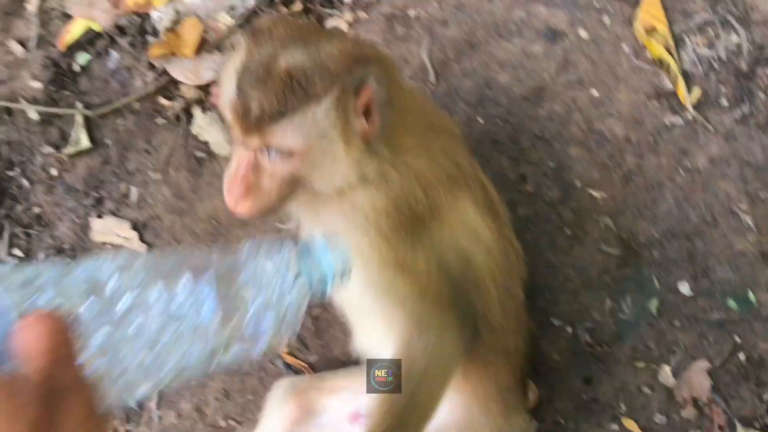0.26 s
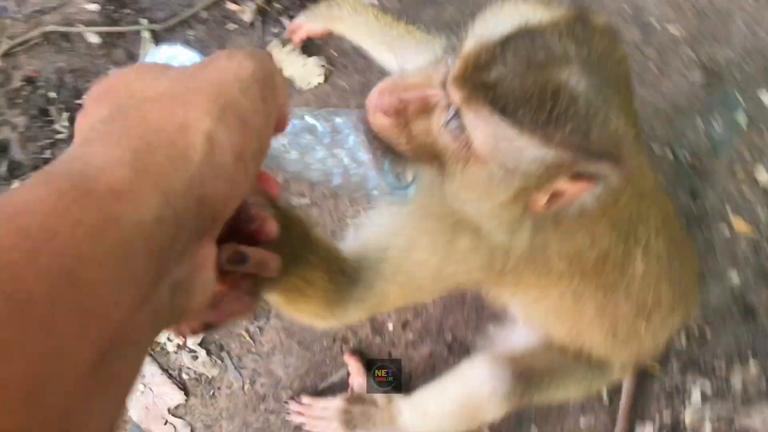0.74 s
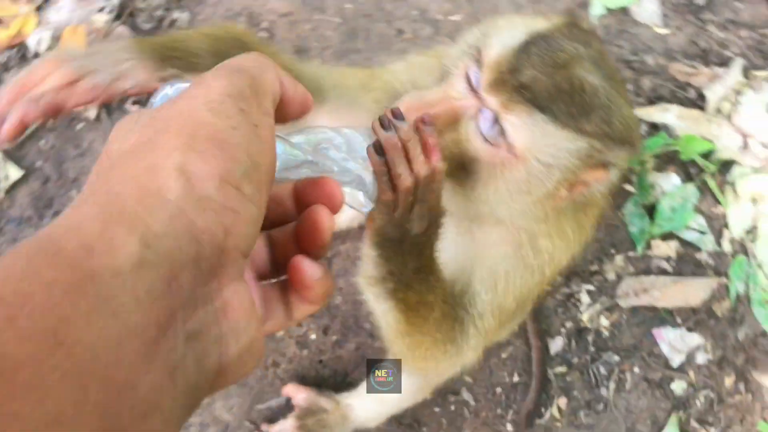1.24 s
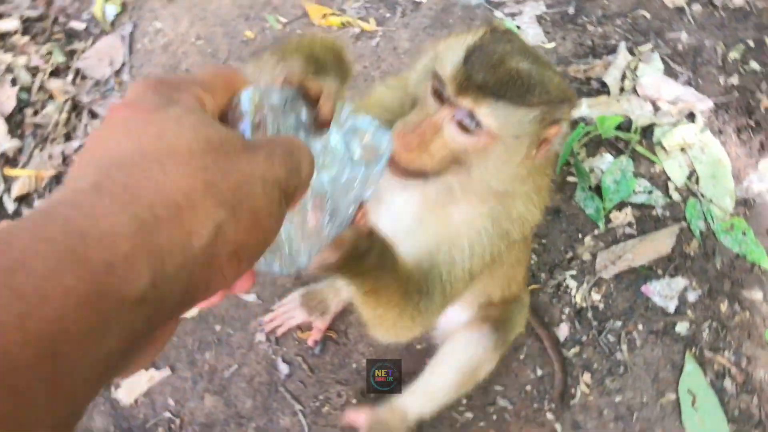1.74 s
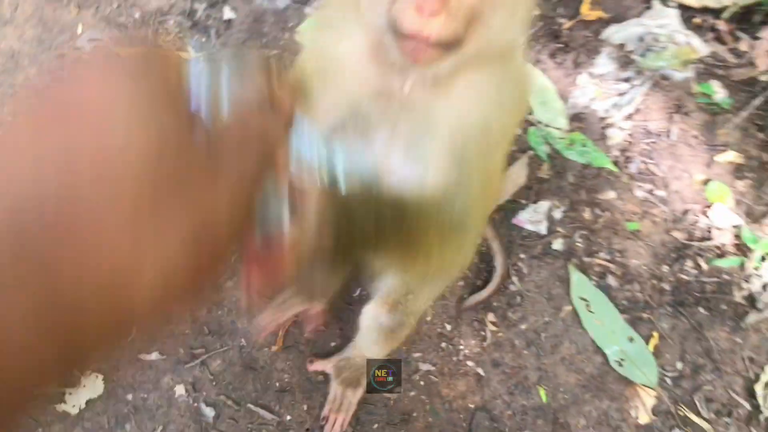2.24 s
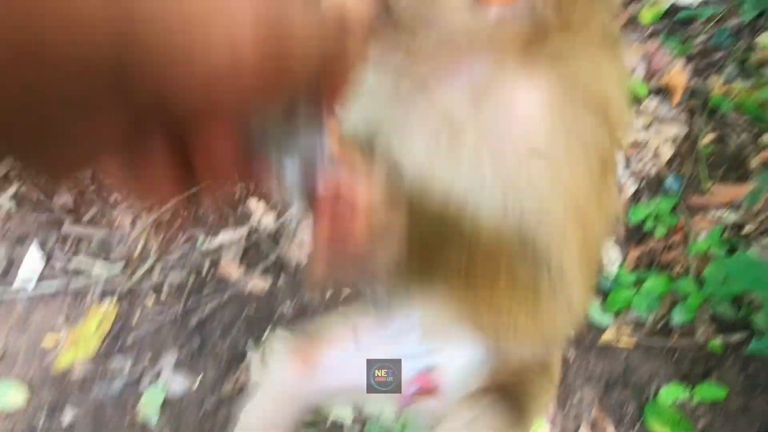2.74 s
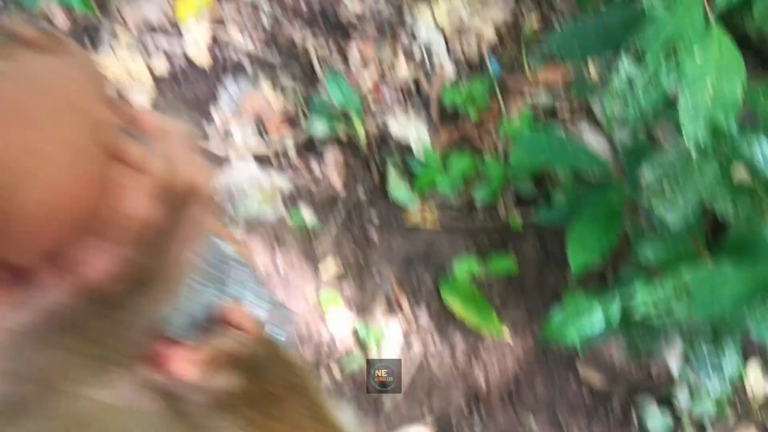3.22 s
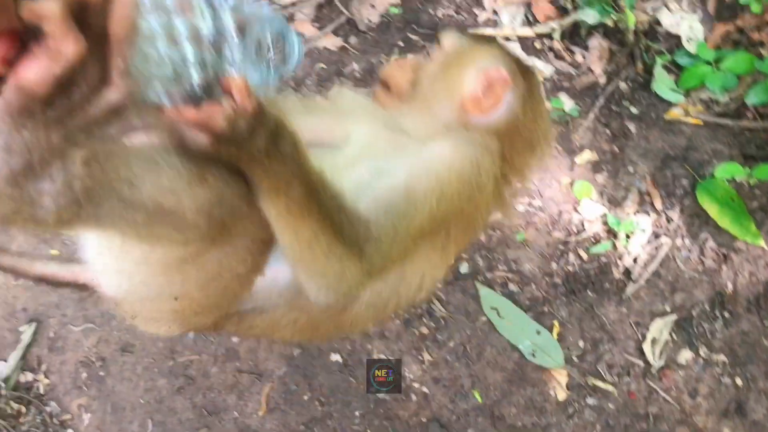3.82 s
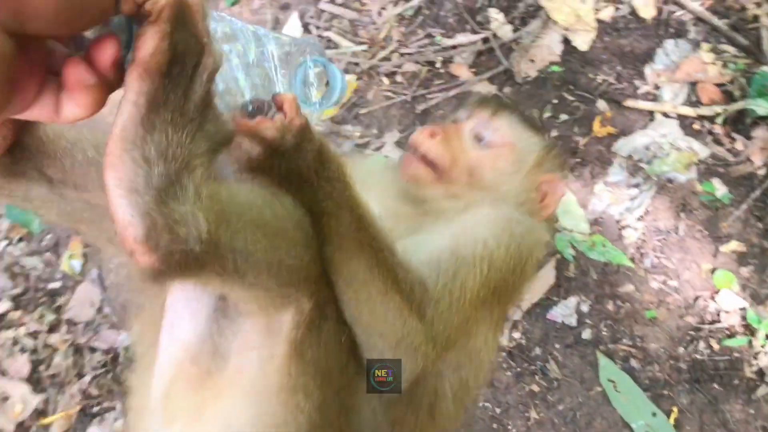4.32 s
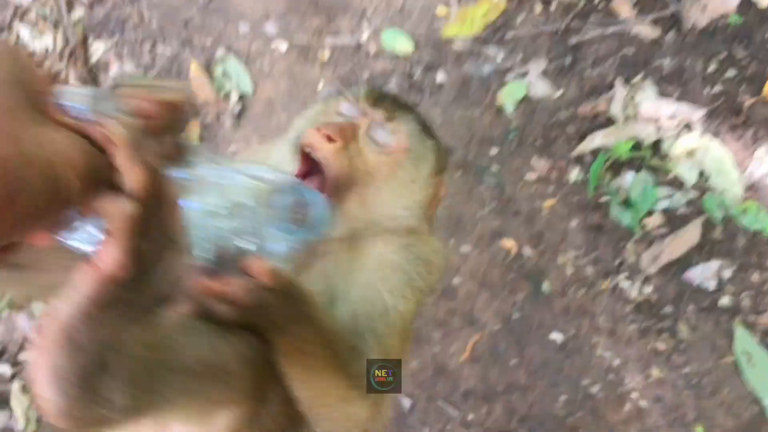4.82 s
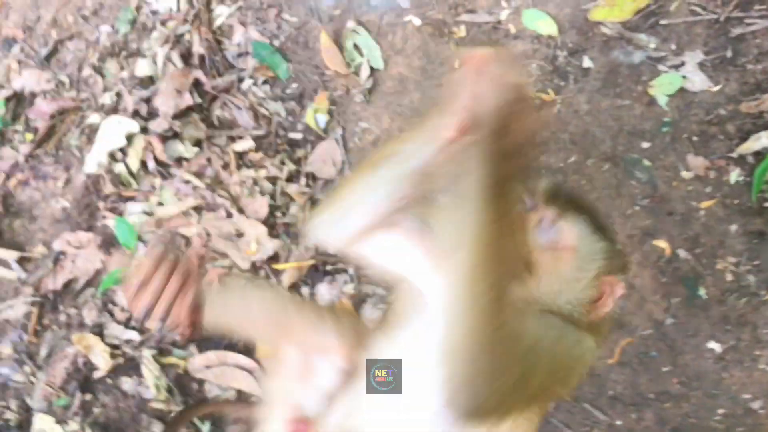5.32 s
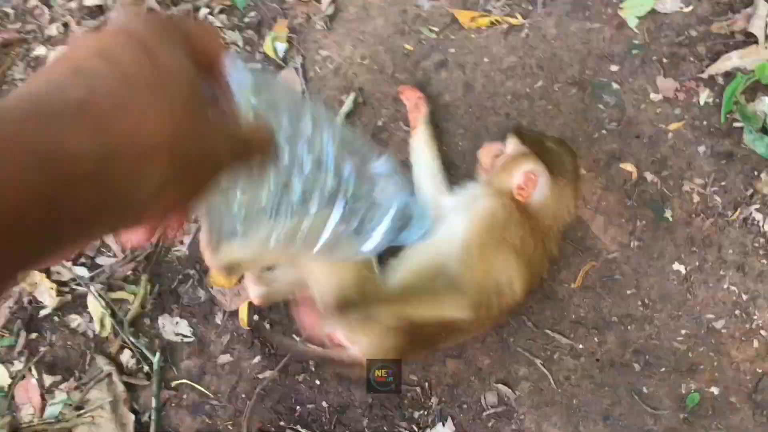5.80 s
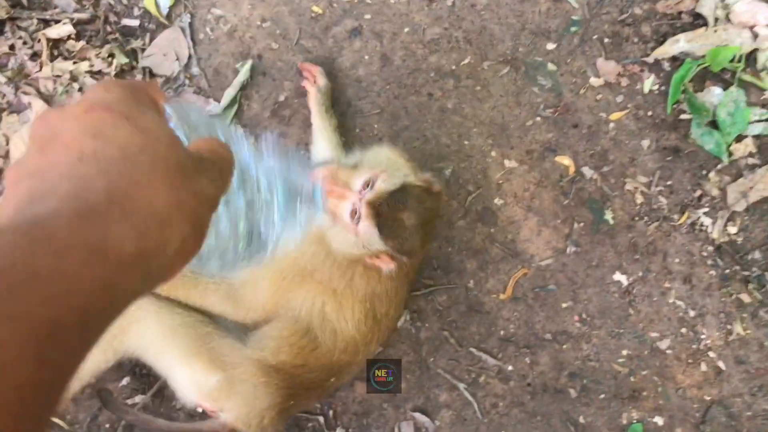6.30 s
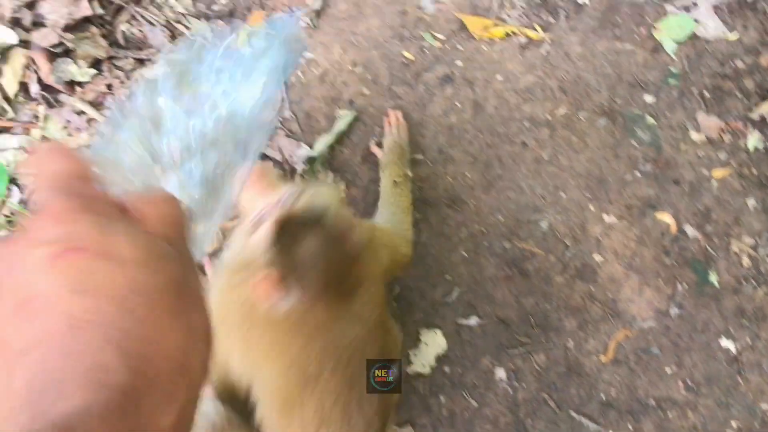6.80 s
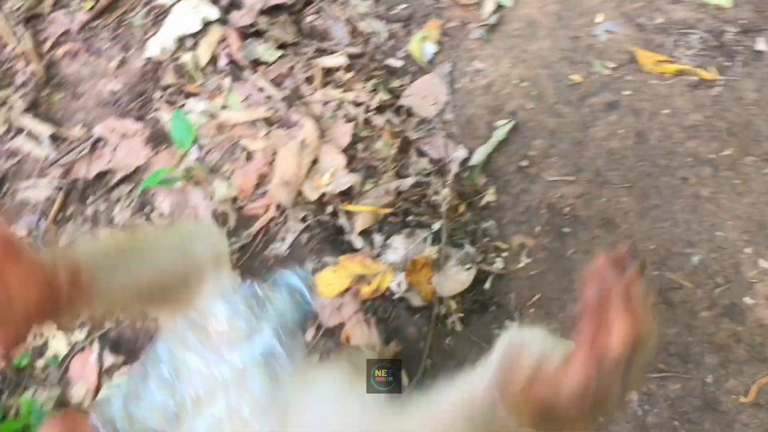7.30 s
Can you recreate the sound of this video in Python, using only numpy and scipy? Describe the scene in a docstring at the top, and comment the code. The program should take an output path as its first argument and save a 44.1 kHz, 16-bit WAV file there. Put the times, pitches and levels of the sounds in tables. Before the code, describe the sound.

A thin empty plastic bottle is pulled between a hand and a small monkey on a forest floor. Sparse pops and rubs come first, then squeaky creaks, ratcheting slips and snaps. A dense loud crackle with hollow thumps peaks just after five seconds, followed by one sharp leaf crunch and soft taps. Close microphone, dry outdoors, low rumble and faint high hiss.

```python
"""Monkey tugging at a plastic bottle

A young monkey grabs and tugs at an empty thin bottle held out by a hand, on a forest floor.
Wall snaps, slips, creaks and taps are jolts of noise-driven wall modes plus a dent ring; thuds are low decaying sines.
Rubbing and dry leaves are coloured noise grains; rumble, faint air and a very high hiss are coloured noise.
"""
import sys
import numpy as np
from scipy import signal
from scipy.fft import rfft, irfft
from scipy.io import wavfile

SR = 44100
rng = np.random.default_rng(int(sys.argv[2]) if len(sys.argv) > 2 else 0)


def put_to_file(sound):
    """Save the sound as 16-bit audio at rate SR, in the file named by the first command-line argument."""
    columns = np.atleast_2d(sound).T  # one column per channel
    safe = np.clip(columns, -1, 1)
    whole_steps = np.round(safe * 32767)
    wavfile.write(sys.argv[1], SR, whole_steps.astype(np.int16))


N = 332955
TIME_S = np.arange(N) / SR
AGE_S = np.arange(4096) / SR   # time since a contact

# Background spectra. Each row: frequency in Hz, relative density in dB per Hz.
RUMBLE_SPECTRUM = [(22, 1), (35, -24), (55, 0), (80, -3.5), (115, -2), (170, -7.5), (250, -17.5),
                   (400, -32.5), (900, -49)]
AIR_SPECTRUM = [(300, -2.5), (1000, 2.5), (2500, -11), (6000, -7.5), (10000, -5)]
HISS_SPECTRUM = [(8000, -20.5), (10300, -25), (11000, -7), (11700, 0.5), (12500, -0.5), (13200, 7.5),
                 (14000, -4.5), (15000, -16), (16000, -13)]
# Rumble swells a little once the animal is on the ground. Each row: time in seconds, level in dB before trim.
RUMBLE_LEVELS = [(0, -50), (5.1, -49), (5.55, -47), (7.55, -45)]

# Steady handling and stirring of litter. Each row: time in seconds, rub level in dB, leaf rustle level in dB.
SHUFFLE = [(0, -57, -73), (.45, -57.5, -65), (.8, -62, -53.5), (1.12, -64.5, -72), (1.25, -55.5, -61),
           (1.7, -56.5, -49.5), (2.02, -62, -75), (2.45, -58, -57), (2.8, -67.5, -67), (3.1, -63.5, -57),
           (3.33, -67.5, -70), (3.7, -66, -60), (3.95, -65.5, -75), (4.6, -57.5, -56), (4.94, -66.5, -67),
           (5.2, -64, -55.5), (5.45, -66.5, -70), (5.62, -58, -44), (5.9, -64, -71), (6.75, -59, -61),
           (7.2, -65, -71), (7.55, -52.5, -48)]
# Single strokes of fur over plastic or through leaves.
# Each row: middle in seconds, half length in seconds (to 1/e of power), rub level in dB, rustle level in dB.
STROKES = [(0.168, .04, -59, -53), (0.764, .045, -65.5, -60), (1.463, .035, -52.5, -49),
           (1.683, 0.026, -50, -52), (2.187, .018, -46.5, -56), (2.557, .025, -54, -53),
           (2.95, .025, -70, -55), (3.246, .025, -60, -56), (4.113, .04, -68.5, -54),
           (4.23, 0.034, -57.5, -68), (4.843, .025, -56.5, -53.5), (5.753, .035, -53.5, -49.5),
           (7.369, .035, -53.5, -51), (7.494, .03, -51, -47)]
# Animal steps or drops into leaves. Each row: start in seconds, peak rms in dB, decay constant in seconds.
CRUNCHES = [(0, -39, 0.021), (5.498, -23.5, 0.018), (5.511, -37, 0.017), (5.545, -45, 0.02),
            (7.485, -52.5, 0.012)]
# Rubbing and leaf spectra. Each row: frequency in Hz, relative density in dB per Hz.
RUB_SPECTRUM = [(250, -5), (600, -7), (1000, -4.5), (1450, 1), (2600, -0.5), (4000, -4), (6000, -15),
                (10000, -28)]
RUSTLE_SPECTRUM = [(2000, -7.5), (4000, -10), (6300, 10), (7600, -2), (8900, 4), (10400, -16), (12800, 11),
                   (15500, -8)]
CRUSH_SPECTRUM = [(150, 1), (500, -11.5), (1500, -0.5), (4000, -2), (8000, -6.5), (10400, -17.5),
                  (12800, 1.5), (15500, -11)]

# Registers: hollow body, wall, crack, snap, sizzle. Each row: low edge in Hz, high edge in Hz.
REGISTERS_HZ = [(500, 920), (920, 2200), (2200, 5000), (5000, 9600), (10500, 15000)]
REGISTER_INDEX = np.arange(len(REGISTERS_HZ))
REGISTER_FILTERS = [signal.butter(4, band, "band", fs=SR, output="sos") for band in REGISTERS_HZ]
# Register shares of light contacts. One value per register: gain in dB.
SLIP_COLOUR_DB = [-26.5, -10, -4, -8, -10.5]
CREAK_COLOUR_DB = [-20.5, -7.5, 0, -2.5, -7.5]
TAP_COLOUR_DB = [-15, -2.5, -9, -13.5, -38]

# Grip gives way in runs of slips. Each row: first slip in seconds, last slip in seconds, number of slips,
# level in dB over 50 ms before fade, unevenness and body resonance, dent pitch in Hz.
SLIPS = [(0.0136, .0121, 1, -47.5, 2650), (.129, .129, 1, -56.5, 2300), (.9028, .9028, 1, -51.5, 1340),
         (1.0821, 1.0823, 1, -55.5, 2970), (1.1858, 1.1863, 1, -54.5, 2190),
         (1.275, 1.2755, 1, -55.5, 1160), (1.475, 1.4901, 2, -49, 2490), (1.5084, 1.5487, 4, -53.5, 2740),
         (1.5892, 1.6103, 2, -51.5, 2190), (1.652, 1.6879, 3, -50.5, 1230), (1.8282, 1.8277, 1, -47, 1570),
         (1.951, 1.9637, 3, -47.5, 3750), (1.9752, 2.0012, 4, -50.5, 2120),
         (2.1058, 2.1315, 2, -43.5, 2650), (2.216, 2.216, 1, -50, 746), (2.2504, 2.2593, 2, -45, 2200),
         (2.2856, 2.31, 3, -48.5, 2200), (2.329, 2.329, 1, -47.5, 2540), (2.3544, 2.3849, 3, -43.5, 2200),
         (2.4165, 2.4254, 2, -46.5, 2070), (2.446, 2.4885, 5, -49.5, 1370), (2.5107, 2.5839, 7, -56, 1220),
         (2.6235, 2.6238, 1, -43.5, 3210), (2.7304, 2.7649, 2, -53.5, 2540),
         (2.8969, 2.8969, 1, -57.5, 2200), (4.479, 4.4793, 1, -51, 1320), (5.183, 5.183, 1, -52.5, 1530),
         (5.581, 5.6277, 2, -53.5, 6500), (7.345, 7.375, 4, -60.5, 1550), (7.3916, 7.3917, 1, -49, 1440),
         (7.4785, 7.4791, 1, -50, 1060)]
SLIP_FADE_DB, SLIP_UNEVEN_DB, SLIP_JITTER_S = 1.5, 3.5, .0004   # the last two grow along the run
# smaller patches ring higher and brighter: dB per register for each octave above the usual pitch
SLIP_USUAL_HZ, SLIP_BRIGHT_DB_PER_OCTAVE = 2200, 1

# Skin sticks and slips in quick trains. Each row: start in seconds, end in seconds, mean slips per second,
# rms level in dB before body resonance, dent pitch in Hz, brightness in dB per register.
CREAKS = [(.286, 0.363, 420, -53, 4150, 5.5), (.362, 0.435, 320, -58, 1450, -10),
          (0.748, 0.815, 440, -51, 6150, 2.5), (1.174, 1.271, 440, -53.5, 2620, -3.5),
          (1.348, 1.398, 460, -44, 2750, -0.5), (1.746, 1.782, 260, -38.5, 2530, -2),
          (1.775, 1.852, 370, -41, 1570, .5), (2.145, 2.171, 296, -29.5, 2360, .5),
          (2.626, 2.661, 193, -42, 2206, -2), (2.738, 2.778, 280, -49.5, 2780, -7),
          (2.971, 3.01, 550, -49.5, 1520, -1), (4.619, 4.68, 390, -45, 1430, -5),
          (5.321, 5.365, 480, -40.5, 2205, -3), (5.385, 5.421, 640, -55.5, 1900, -9),
          (5.99, 6.006, 400, -59, 1930, -11), (6.253, 6.284, 470, -61, 1220, -14)]
CREAK_SLOWING = 0.13   # starts this share above its mean rate, ends as far below

# Soft taps on the bottle. Each row: time in seconds, level in dB before register shares.
TAPS = [(0.376, -52.5), (0.414, -51), (.436, -55), (3.6902, -49.5), (3.7137, -49.5), (3.767, -57),
        (3.796, -57.5), (5.821, -47.5), (5.894, -52), (5.95, -53), (6.079, -54.5), (6.1185, -54.5),
        (6.23, -55), (6.3793, -50), (6.5097, -44), (6.645, -49), (6.6551, -46.5), (6.73, -56.5),
        (6.788, -43), (6.802, -46.5), (6.8747, -45.5), (6.947, -49.5), (7.018, -55.5), (7.074, -56)]
TAP_HZ, TAP_SPREAD_OCTAVES = 1340, 0.044   # all taps wake nearly the same note

# Wall pops in or out. Each row: time in seconds, level in dB over 50 ms before cavity and body resonance,
# dent pitch in Hz, decay constant in seconds at 2 kHz, brightness in dB per register, midrange hump in dB.
BUCKLES = [(.533, -40.5, 1380, 0.012, -2, -5), (0.9285, -26.5, 2380, 0.002, -0.5, 7),
           (1.7015, -39, 1120, 0.00041, -8.5, 2), (1.8939, -28.5, 1625, .002, 3.5, -2.5),
           (2.0671, -39, 2520, 0.0021, 4, 3.5), (2.0916, -39.5, 2570, 0.0058, 7, 8),
           (2.0963, -40, 2120, 0.0013, 2.3, -10.5), (2.225, -35.5, 1700, 0.0019, -1.7, -1.2),
           (2.341, -28, 2201, 0.0012, 1.2, 2), (2.6614, -29.5, 997, 0.0034, 3, -1),
           (2.6823, -41.5, 2020, 0.00074, 4.5, -4.5), (2.7957, -31, 1690, 0.0019, 0, 4.5),
           (2.9217, -27.5, 3400, 0.002, 6.5, 5), (3.0165, -50.5, 1540, .003, -5, -6),
           (3.0654, -29.5, 1140, .0006, -5.5, -0.5), (3.0883, -38, 2180, 0.00089, 2.8, 2),
           (3.1087, -48, 1160, 0.0017, 1.5, -9), (3.1187, -31.5, 1090, 0.0039, 2.3, -3),
           (3.196, -52, 1500, 0.00076, -5.5, -2), (3.4312, -43, 1400, 0.0062, -3.5, -2.5),
           (3.4577, -43.5, 1810, 0.0036, 3.3, 0), (3.513, -34, 2770, .0009, -3, 6.5),
           (3.6065, -47, 1380, 0.0087, -4.5, 2), (3.663, -35.5, 1510, 0.00041, -12, 14.5),
           (3.6664, -28, 1440, 0.0035, 5, -6.5), (4.191, -44.5, 974, .004, -4.5, -3),
           (4.2757, -42.5, 1820, 0.0058, -2.4, 1.5), (4.3442, -50.5, 940, 0.0048, -1.5, -1),
           (4.4333, -40.5, 4290, 0.0028, 1.3, 4.5), (4.4654, -40.5, 4300, 0.0014, 0.7, 6),
           (4.526, -21.5, 1555, 0.0032, 4.5, -0.2), (4.6131, -33.5, 4500, 0.0021, 6.5, 6),
           (4.691, -29, 1590, 0.0022, 2.3, -1), (4.7066, -46, 6950, .0015, 12, 5),
           (4.725, -37.5, 1720, .0016, -2, 7), (4.75, -31, 1320, 0.001, 7.5, -4.5),
           (4.8058, -25, 1415, 0.0023, 6, -2.5), (4.9852, -38.5, 940, 0.0019, -4, -4.5),
           (4.9923, -37.5, 940, 0.0022, -5, -4.5), (5.0512, -34, 1650, 0.011, -3, -4),
           (5.056, -40.5, 820, 0.0028, 2, -12), (5.065, -45, 1440, 0.008, -3, -4),
           (5.0833, -37.5, 1600, 0.0024, -5.5, 1), (5.0915, -39, 1390, .0023, 4, 3),
           (5.0949, -26, 835, .0025, 0.5, -21), (5.0988, -33, 770, 0.0018, -1, 1.5),
           (5.101, -41, 1550, 0.0017, -2, 3), (5.1072, -36.5, 1340, 0.0041, -1.5, -4),
           (5.1186, -24.5, 1610, 0.0031, 3.5, 0), (5.1407, -38.5, 1700, 0.0021, -1, -1),
           (5.234, -44, 1430, 0.0031, -0.5, -10), (5.2396, -28, 5210, 0.0018, 7.5, 3),
           (5.2551, -27, 1020, 0.0018, 4, -5.5), (5.26, -26.5, 1440, 0.0071, -1.5, 0.5),
           (5.2678, -22.5, 1520, 0.001, 1.8, 0), (5.2743, -34, 1480, 0.003, 0, -6),
           (5.284, -24, 1505, 0.0074, -2.5, 1), (5.2949, -25.5, 2200, 0.0029, 2.7, 1.8),
           (5.3051, -28.5, 1550, 0.0019, -4, 1.7)]
# Average snap. One value per register: share in dB.
BUCKLE_COLOUR_DB = [-5.5, 7.5, 6, 2.54, -5]
# Midrange hump shape. One value per register: change in dB per dB of hump.
HUMP_DB_PER_DB = [-1.34, -0.27, 1, 0.21, -0.53]
# Dull snaps wake broad panels, bright ones stiff ribs. Each row: brightness in dB per register, overtone in Hz.
OVERTONE = [(-5, 1850), (2.5, 2250), (2, 6270), (6.5, 7220)]
OVERTONE_SPREAD_OCTAVES = .08
DENT_SECOND_RATIO, DENT_SECOND_DB = 2.7, -6   # second mode of a dent

# Blunt blows on the whole bottle. Each row: time in seconds, initial envelope in dB, pitch in Hz, T60 in seconds.
THUDS = [(0.5353, -26.5, 144, 0.081), (0.5331, -31, 294, 0.078), (3.068, -30, 348, 0.03),
         (3.12, -50, 330, 0.028), (3.512, -38.5, 400, 0.025), (3.667, -38.5, 337, 0.053),
         (4.191, -33, 335, 0.039), (5.054, -25, 307, 0.045), (5.0946, -21, 243, 0.015),
         (5.0993, -26, 550, 0.038), (5.268, -32, 229, 0.041), (5.294, -29, 185, 0.021),
         (7.479, -33.5, 776, 0.021)]
# Resonances of the whole bottle. Each row: centre in Hz, width in Hz, gain in dB.
BODY = [(1440, 25, -11.5), (1570, 220, -7)]


def from_db(db):
    """Decibels to gain."""
    return 10 ** (np.asarray(db) / 20)


def rms_one(x):
    """Scale to rms 1."""
    return x / np.sqrt(np.mean(x ** 2) + 1e-20)


def level_one(x):
    """Scale a short sound to the energy of 50 ms at rms 1."""
    return x / np.sqrt(np.sum(x ** 2) / (SR / 20) + 1e-20)


def in_time(rows):
    """Interpolate each curve column at every sample."""
    s, *columns = np.transpose(rows)
    return [np.interp(TIME_S, s, column) for column in columns]


def add(track, s, sound):
    """Mix a sound in at time s."""
    start = max(0, round(s * SR))
    track[start:start + len(sound)] += sound[:max(0, N - start)]


def coloured(x, spectrum):
    """Give a steady signal a smooth spectrum with steep ends; rms 1."""
    hz, db = np.transpose(spectrum)
    f = np.arange(N // 2 + 1) * SR / N + 1e-3
    ends = 1 / np.sqrt((1 + (hz[0] * .8 / f) ** 8) * (1 + (f / hz[-1]) ** 16))
    gain = from_db(np.interp(np.log(f), np.log(hz), db))
    return rms_one(irfft(rfft(x) * ends * gain, N))


def drift(knots_per_s):
    """Slow random wander; rms 1."""
    knots = rng.standard_normal(4000)
    return rms_one(np.interp(TIME_S * knots_per_s, np.arange(len(knots)), knots))


def background(air_db=-62.0, hiss_db=-54.0, rumble_trim_db=-1.5):
    """Wavering low rumble, faint open air and a steady, very high hiss, all coloured noise."""
    rumble_db, = in_time(RUMBLE_LEVELS)
    rumble_gain = from_db(rumble_db + rumble_trim_db + drift(knots_per_s=6.7))
    rumble = rumble_gain * coloured(rng.standard_normal(N), RUMBLE_SPECTRUM)
    air = from_db(air_db) * coloured(rng.standard_normal(N), AIR_SPECTRUM)
    hiss = from_db(hiss_db) * coloured(rng.standard_normal(N), HISS_SPECTRUM)
    return rumble + air + hiss


def handling():
    """Rub and rustle levels in dB: steady shuffle plus a smooth power swell per stroke."""
    power = from_db(in_time(SHUFFLE)) ** 2
    for s, half_s, *db in STROKES:
        swell = np.exp(-np.minimum(((TIME_S - s) / half_s) ** 2, 20))
        power = power + from_db(db)[:, None] ** 2 * swell
    return 10 * np.log10(power)


def grains(per_s, spread_db, decay_s):
    """Tiny fractures of uneven size, each a puff of noise; rms 1."""
    sizes = from_db(spread_db * np.minimum(rng.exponential(1, N), 4))
    sizes = sizes * (rng.random(N) < per_s / SR)
    power = signal.lfilter([1], [1, -np.exp(-2 / (decay_s * SR))], sizes ** 2 + 1e-12)
    return rms_one(np.sqrt(power) * rng.standard_normal(N))


def leaves():
    """Fur rubs on plastic and dry litter crackles; a step or drop crushes many leaves at once."""
    rub_db, rustle_db = handling()
    motion = drift(knots_per_s=39)
    rubbing = grains(per_s=900, spread_db=3.5, decay_s=.002)
    crackling = grains(per_s=900, spread_db=4.0, decay_s=.0012)
    crushing = grains(per_s=1200, spread_db=3.0, decay_s=.001)
    rub = from_db(rub_db + 1.37 * motion) * coloured(rubbing, RUB_SPECTRUM)
    rustle = from_db(rustle_db + 1.1 * motion) * coloured(crackling, RUSTLE_SPECTRUM)
    crush_gain = np.zeros(N)
    for s, db, decay_s in CRUNCHES:
        crush_gain += from_db(db) * (TIME_S >= s) * np.exp(-np.abs(TIME_S - s) / decay_s)
    return rub + rustle + crush_gain * coloured(crushing, CRUSH_SPECTRUM)


def shell(dents, decay_s, register_db, dent_s=0.0026, crack_db=-18.0, crack_s=0.00028,
          kick_db=-10.0, damping=0.065, linger_db=-20.5, linger_s=0.0086):
    """One wall jolt: kick, crack, a crowd of quickly dying modes and the dent rings (Hz, dB)."""
    out = np.zeros(len(AGE_S))
    kick = from_db(kick_db) * level_one(1.0 * (AGE_S == 0))
    for (low, high), sos, db in zip(REGISTERS_HZ, REGISTER_FILTERS, register_db):
        life_s = decay_s * (2000 / np.sqrt(low * high)) ** damping   # high modes die first
        crack = from_db(crack_db) * np.sqrt(high / REGISTERS_HZ[1][1])   # first instant is brightest
        fade = np.exp(-AGE_S / life_s) + crack * np.exp(-AGE_S / crack_s)
        fade += from_db(linger_db) * np.exp(-AGE_S / linger_s)
        force = level_one(fade * rng.standard_normal(len(AGE_S))) + kick
        modes = level_one(signal.sosfilt(sos, force))
        for hz, dent_db in dents:
            if low <= hz < high:
                envelope = np.exp(-AGE_S / dent_s) * (1 - np.exp(-AGE_S * hz))
                ring = np.sin(2 * np.pi * hz * AGE_S) * envelope
                modes = level_one(modes + from_db(dent_db) * level_one(ring))
        out += from_db(db) * modes
    return out


def crinkles(count=150, size_db=-10.0, spread_db=3.0):
    """Tiny creases give way at random, more often and louder the harder the bottle is handled."""
    out = np.zeros(N)
    rub_db, _ = handling()
    strain = np.cumsum(from_db(rub_db))
    for when, size, pitch in rng.random((count, 3)):
        at = np.searchsorted(strain, when * strain[-1])
        db = rub_db[at] + size_db + spread_db * (2 * size - 1)
        dent_hz = 1100 * 2 ** (2 * pitch)
        add(out, at / SR, shell([(dent_hz, -2.0)], .0022, np.array(SLIP_COLOUR_DB) + db))
    return out


def touch(dent_hz, register_db, decay_s, dent_db, dent_s):
    """One light contact: a soft jolt with a dent ring and an audible short tail."""
    return shell([(dent_hz, dent_db)], decay_s, register_db, dent_s=dent_s, linger_db=-13.0, crack_db=3.0)


def slips(change=0.48):
    """The grip ratchets over the ribs: nearly even, alike steps on one patch, fading as the pull eases."""
    out = np.zeros(N)
    for first, last, number, db, dent_hz in SLIPS:
        places = np.linspace(0, 1, max(1, round(number)))
        bright_db = SLIP_BRIGHT_DB_PER_OCTAVE * np.log2(dent_hz / SLIP_USUAL_HZ)
        colour = np.array(SLIP_COLOUR_DB) + bright_db * (REGISTER_INDEX - 2)
        patch, *steps = [touch(dent_hz, colour, decay_s=0.0035, dent_db=-1.5, dent_s=0.0017)
                         for _ in range(len(places) + 1)]
        chance = rng.standard_normal((len(places), 2))
        for place, step, (late, strong) in zip(places, steps, chance):
            level_db = db - SLIP_FADE_DB * (place - places.mean()) + SLIP_UNEVEN_DB * strong * place
            s = first + (last - first + SLIP_JITTER_S * late) * place
            add(out, s, from_db(level_db) * level_one(patch + change * step))
    return out


def creaks(jitter_cycles=.1, change=0.4, dent_db=1.5, first_pressure=0.75):
    """Each slip jolts nearly the same patch, which shifts as the skin travels; the train slows as it goes."""
    out = np.zeros(N)
    damped = dict(decay_s=.0013, dent_s=.0013, linger_db=-22.0)   # pressing skin damps the wall
    for start, end, rate, db, dent_hz, bright_db in CREAKS:
        colour = np.array(CREAK_COLOUR_DB) + bright_db * REGISTER_INDEX
        way = np.linspace(0, 1, max(round((end - start) * SR), 2))
        cycles = np.cumsum(rate * (1 + CREAK_SLOWING * (1 - 2 * way))) / SR
        chance = rng.standard_normal((64, 2))
        at = np.searchsorted(cycles, np.arange(64) + jitter_cycles * chance[:, 0])
        inside = at < len(way)
        pressure = first_pressure + np.sin(np.pi * way)
        travel = np.pi / 2 * at / len(way)
        train = 0
        # crossfade from one patch to the next, plus a random share of a third
        for weight in (np.cos(travel), np.sin(travel), change * chance[:, 1]):
            jolts = np.zeros(len(way))
            jolts[at[inside]] = weight[inside]
            jolt = shell([(dent_hz, dent_db)], register_db=colour, **damped)
            train = train + signal.fftconvolve(jolts * pressure, jolt)
        add(out, start, from_db(db) * train / np.sqrt(np.sum(train ** 2) / len(way)))
    return out


def taps():
    """Soft blows of the bottle against the animal."""
    out = np.zeros(N)
    for s, db in TAPS:
        dent_hz = TAP_HZ * 2 ** (TAP_SPREAD_OCTAVES * rng.standard_normal())
        register_db = np.array(TAP_COLOUR_DB) + db
        add(out, s, touch(dent_hz, register_db, decay_s=0.0061, dent_db=-3.0, dent_s=0.004))
    return out


def buckles(early_s=0.00018, dent_db=0.0, overtone_db=-6.5, cavity_hz=333.0, cavity_t60_s=0.044,
            cavity_db=-9.0):
    """Loud snaps of different wall patches, each with its own colour; each also pumps the air inside."""
    out = np.zeros(N)
    for s, db, dent_hz, decay_s, bright_db, hump_db in BUCKLES:
        colour = np.array(BUCKLE_COLOUR_DB) + bright_db * REGISTER_INDEX + hump_db * np.array(HUMP_DB_PER_DB)
        register_db = db + colour - 20 * np.log10(np.linalg.norm(from_db(colour)))
        overtone_hz = np.interp(bright_db, *np.transpose(OVERTONE))
        overtone_hz *= 2 ** (OVERTONE_SPREAD_OCTAVES * rng.standard_normal())
        dents = [(dent_hz, dent_db), (dent_hz * DENT_SECOND_RATIO, DENT_SECOND_DB), (overtone_hz, overtone_db)]
        add(out, s - early_s, shell(dents, decay_s, register_db))
        pitch_ratio = np.exp(0.15 * rng.standard_normal())   # hollow note varies at random from snap to snap
        cavity = np.sin(2 * np.pi * cavity_hz * pitch_ratio * AGE_S) * from_db(-60 * AGE_S / cavity_t60_s)
        add(out, s, from_db(register_db[0] + cavity_db) * level_one(cavity))
    return out


def thuds():
    """The bottle as a whole gives a short low note: a decaying sine."""
    out = np.zeros(N)
    for s, db, hz, t60_s in THUDS:
        add(out, s, from_db(db - 60 * AGE_S / t60_s) * np.sin(2 * np.pi * hz * AGE_S))
    return out


def bottle_body(x):
    """Add the bottle's own two-pole resonances to the wall contacts."""
    out = x.copy()
    for hz, width_hz, db in BODY:
        r = np.exp(-np.pi * width_hz / SR)
        zeros = (1 - r * r) / 2 * np.array([1, 0, -1])
        poles = [1, -2 * r * np.cos(2 * np.pi * hz / SR), r * r]
        out += from_db(db) * signal.lfilter(zeros, poles, x)
    return out


def outdoors(x, ground_s=.0046, ground_db=-27.0, scatter_db=-32.0, scatter_t60_s=0.35):
    """One bounce off the ground, then faint scatter from trunks and foliage."""
    bounce = np.interp(TIME_S - ground_s, TIME_S, x, left=0)
    t = TIME_S[:SR // 2]
    envelope = from_db(-60 * t / scatter_t60_s) * (1 - np.exp(-t / 0.0059))
    scatter = rng.standard_normal(len(t)) * envelope
    scatter = signal.sosfilt(signal.butter(1, [500, 6500], "band", fs=SR, output="sos"), scatter)
    tail = signal.fftconvolve(x, scatter / np.sqrt(np.sum(scatter ** 2)))[:N]
    return x + from_db(ground_db) * bounce + from_db(scatter_db) * tail


def scene():
    """The bottle close by, the forest floor around it."""
    contacts = buckles() + slips() + taps() + creaks() + crinkles()
    bottle = bottle_body(contacts) + thuds()
    return (outdoors(bottle) + leaves() + background())[None]


def record(dry, bass_cut_hz=32, ceiling=.72, top_stop_hz=17000):
    """Cut the deepest bass, round the highest peaks, cut the top."""
    thin = signal.sosfilt(signal.butter(3, bass_cut_hz, "high", fs=SR, output="sos"), dry)
    rounded = ceiling * np.tanh(thin / ceiling)
    return signal.sosfilt(signal.cheby2(14, 70, top_stop_hz, fs=SR, output="sos"), rounded)


dry = scene()
out = record(dry)
put_to_file(out)
```